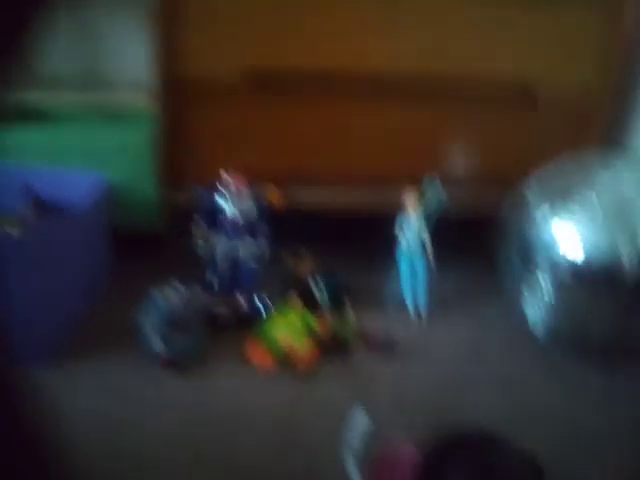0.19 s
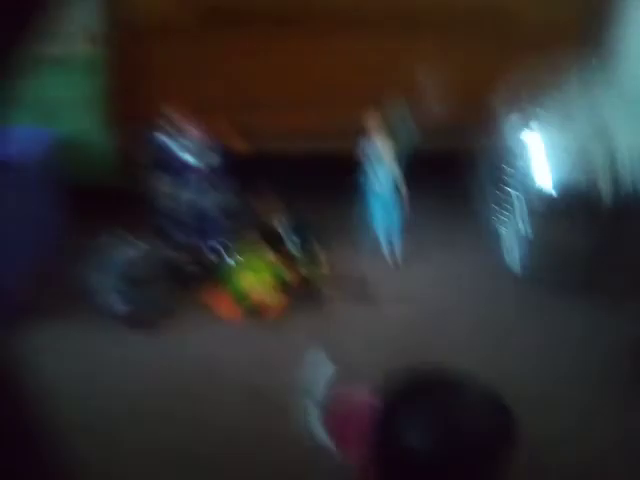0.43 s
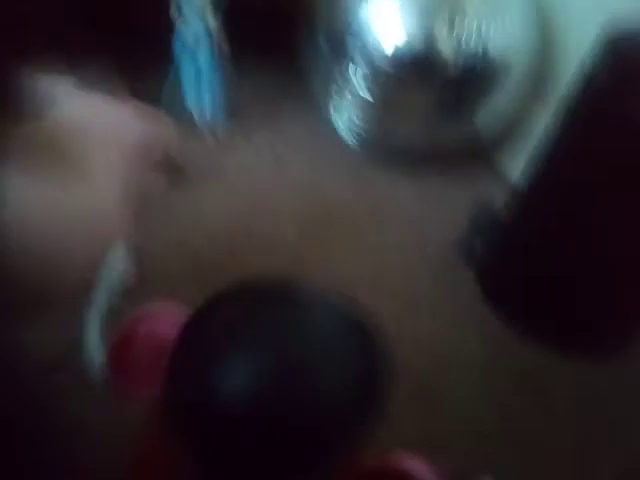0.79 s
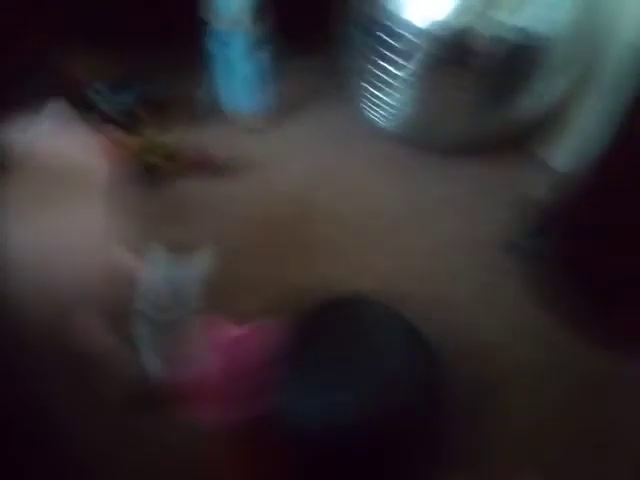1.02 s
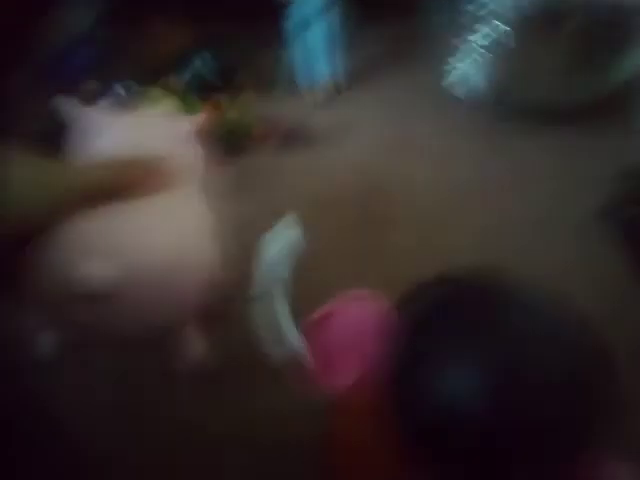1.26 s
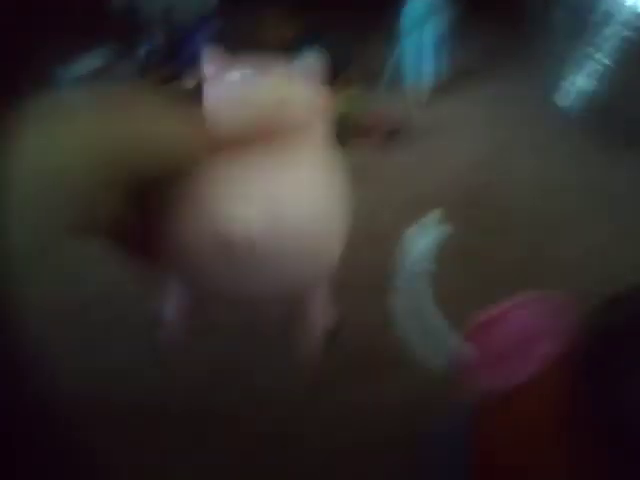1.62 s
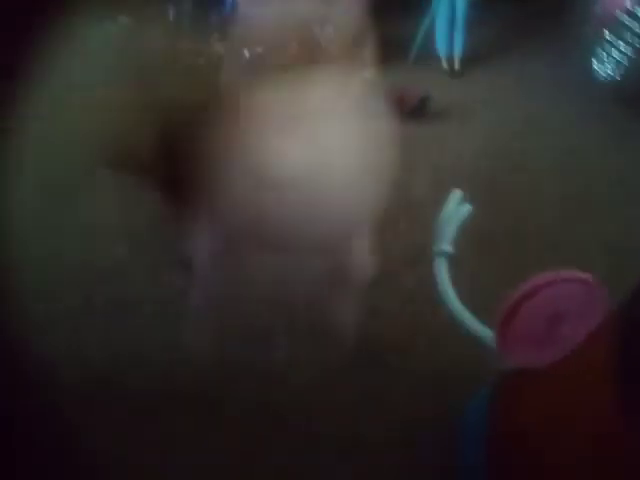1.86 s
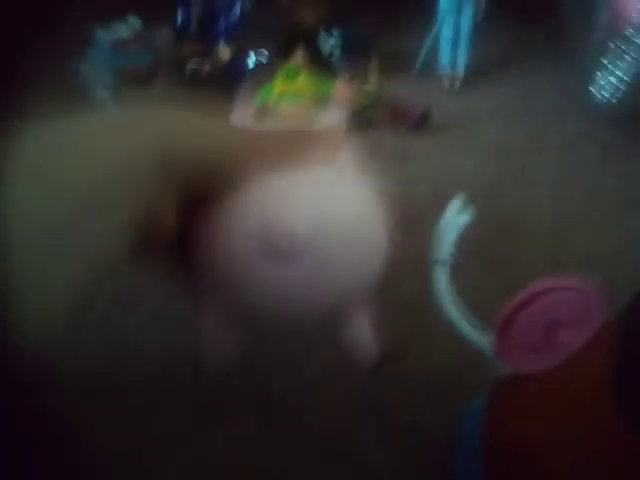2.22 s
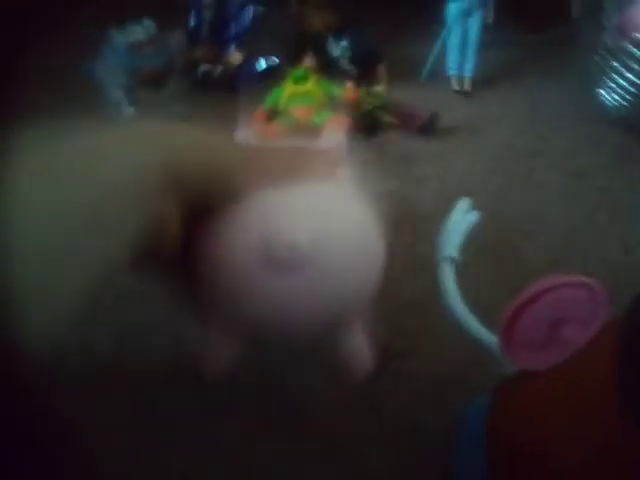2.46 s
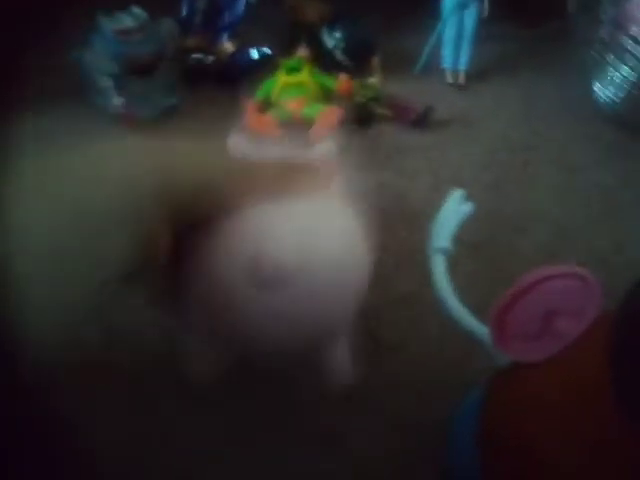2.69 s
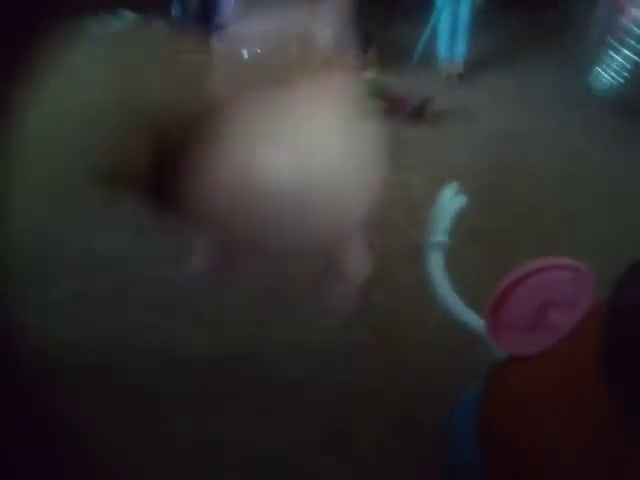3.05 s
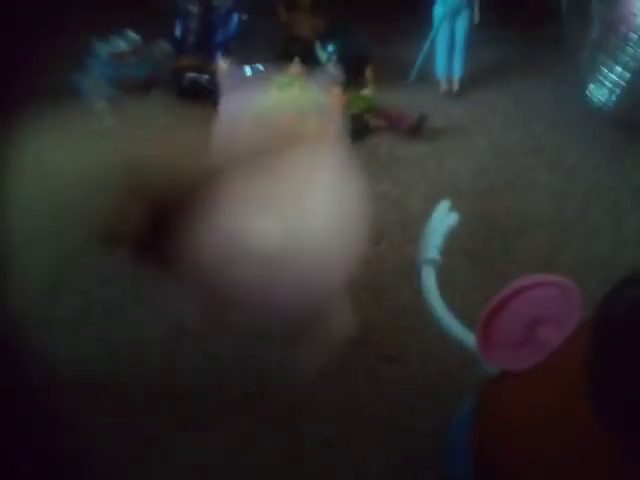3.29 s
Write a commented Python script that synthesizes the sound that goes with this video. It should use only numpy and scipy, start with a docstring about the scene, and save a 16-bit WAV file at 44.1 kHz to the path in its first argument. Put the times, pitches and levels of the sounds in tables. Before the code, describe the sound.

After a near-silent start with a faint rub, a hand lifts a plastic toy bank and shakes it; coins clack and patter against the shell, with dull handling bumps, close up in a small soft room.

```python
"""Coins in a plastic toy bank

A hand lifts a hollow toy bank off a carpet and shakes it close to a small camera, over a quiet hush.
Filtered noise brushes; noise bursts and rough rings make the coin knocks and their patter of ticks.
Decaying sines make the hollow body's low ring, the handling bumps and the very high coin chimes.
A short, dull noise tail puts the coins, chimes and brushing in a small room."""
import sys
import numpy as np
from scipy import signal
from scipy.fft import rfft, irfft, next_fast_len
from scipy.io import wavfile
from scipy.ndimage import uniform_filter1d

SR = 44100
rng = np.random.default_rng(int(sys.argv[2]) if len(sys.argv) > 2 else 0)


def transcribe(u):
    """Save the signal u as a 16-bit wav file named by the first command-line argument.

    u: samples, shape (n,) or (channels, n), limited to [-1, 1]; the rate is SR.
    q: integer samples, one column per channel.
    """
    v = np.clip(np.atleast_2d(u).T, -1, 1)
    q = np.round(v * 32767).astype(np.int16)
    wavfile.write(sys.argv[1], SR, q)


N = 152145  # length in samples


def amp(db):
    """Decibels to amplitude."""
    return 10 ** (np.asarray(db) / 20)


def unit(x):
    """Scale to an RMS of one."""
    return x / np.sqrt(np.mean(x ** 2) + 1e-20)


def curve(rows):
    """One dB value per sample, practically silent (-120 dB) after the table."""
    s, db = np.transpose(rows)
    return np.interp(np.arange(N) / SR, s, db, right=-120)


def coloured(x, points):
    """Filter x to the (Hz, dB) shape with a minimum-phase response, so nothing sounds early."""
    m = 4096
    hz, db = np.transpose(points)
    bins_hz = np.fft.rfftfreq(m, 1 / SR)
    shape_db = np.interp(np.log(bins_hz + 1), np.log(hz), db)
    cepstrum = irfft(np.log(amp(shape_db)), m)
    # folding the cepstrum onto positive time makes the filter causal
    cepstrum[1:m // 2] *= 2
    cepstrum[m // 2 + 1:] = 0
    impulse = irfft(np.exp(rfft(cepstrum)), m)
    return signal.fftconvolve(x, impulse)[:N]


def place(s, sounds):
    """Sum the rows of sounds at their start times."""
    starts = np.round(np.asarray(s) * SR).astype(int)
    at = starts[:, None] + np.arange(sounds.shape[1])
    return np.bincount(at.ravel(), sounds.ravel(), N + SR)[:N]


KNOCK_Q, KNOCK_NOISE_DB = 8.05, -2.5  # ring sharpness; burst level against the ring
BRIGHTENS, TAP_RISE_S = 0.51, 0.0012  # harder raps hiss more (dB per dB); contact time


def taps(s, db, hz, t60):
    """Short raps: a dying burst of noise plus a rough ring at each pitch."""
    t = np.arange(1400) / SR
    noise = rng.standard_normal((2, len(s), len(t)))
    burst_db = KNOCK_NOISE_DB + BRIGHTENS * (db[:, None] + 19.0)
    burst = amp(burst_db - 60 * t / t60) * noise[0]
    rough = 1 + 8.66 * uniform_filter1d(noise[1], size=60, axis=1)
    cycles = np.outer(hz, t)
    ring = rough * np.exp(-np.pi * cycles / KNOCK_Q) * np.sin(2 * np.pi * cycles)
    rise = 1 - np.exp(-t / TAP_RISE_S)
    return place(s, amp(db)[:, None] * rise * (burst + ring))


DAMPING = 1.25  # power of time: rings hold, then die faster


def strike(s, db, stretch, modes, scatter_db, attack_s, rough):
    """Each blow stretches the modes' pitch and scatters their levels; loose contact flutters the ring."""
    t = np.arange(SR // 3) / SR
    luck = scatter_db * rng.standard_normal((len(s), len(modes)))
    rings = 0
    for k, (hz, level_db, t60) in enumerate(modes):
        start_db = (db + level_db + luck[:, k])[:, None]
        decay = amp(start_db - 60 * (t / t60) ** DAMPING)
        rings = rings + decay * np.sin(2 * np.pi * hz * np.outer(stretch, t))
    wobble = uniform_filter1d(rng.standard_normal(rings.shape), size=150, axis=1)
    flutter = 1 + rough * unit(wobble)
    return place(s, rings * flutter * (1 - np.exp(-t / attack_s)))


def grip_db(s):
    """The grip loosens and frees the ringing: its level climbs 2 dB per second until 2 s."""
    return 2 * np.minimum(s - 2, 0)


# Tone of the background hush: pitch_hz [Hz], density_db [dB per Hz, relative]
HUSH_TONE = [(30, -23), (70, 3), (180, -5), (500, -17), (2300, -22.5), (12000, -42)]
HUSH_DB = -67.5  # RMS level


def hush():
    """Steady, low-weighted noise under everything."""
    return amp(HUSH_DB) * unit(coloured(rng.standard_normal(N), HUSH_TONE))


# The bank brushing carpet and hand: time_s [s], level_db [dB]
BRUSH_LEVEL = [(0, -60.5), (.115, -43.5), (.2, -62), (.28, -101), (.4, -76.5), (.49, -52), (.75, -69.5)]
# Tone of plastic rubbing on pile: pitch_hz [Hz], density_db [dB per Hz, relative]
RUB_TONE = [(200, 0), (550, 5), (1400, -7.5), (2650, 8), (3900, -14), (5100, -5), (8000, -40)]


def brush():
    """Fuzzy rubbing of plastic on pile: noise with a randomly uneven grain."""
    grain = amp(2.8 * unit(uniform_filter1d(rng.standard_normal(N), size=200)))
    rubbing = coloured(grain * rng.standard_normal(N), RUB_TONE)
    return amp(curve(BRUSH_LEVEL)) * unit(rubbing)


# Coins knocking the shell: start_s [s], level_db [dB, relative strength], pitch_hz [Hz]
COIN_KNOCKS = [(0.497, -27.5, 1950), (0.518, -21.5, 2370), (0.544, -22, 2050), (0.556, -19.5, 2800),
               (0.584, -21, 1610), (0.608, -38, 2300), (0.767, -29.5, 1430), (0.81, -18.5, 2870),
               (0.889, -29, 1015), (0.904, -16, 2090), (0.96, -24.5, 2650), (0.984, -18.5, 3160),
               (1.014, -18.5, 1740), (1.023, -15.5, 1497), (1.043, -20, 2120), (1.069, -16, 2240),
               (1.088, -18, 1880), (1.115, -17.5, 2430), (1.181, -14, 1910), (1.284, -28, 2620),
               (1.323, -16.5, 2240), (1.329, -24.5, 1990), (1.349, -12, 1570), (1.363, -13, 2510),
               (1.475, -15.5, 3370), (1.512, -22, 3050), (1.546, -13, 1306), (1.558, -13, 6100),
               (1.599, -15.5, 1190), (1.713, -19, 3250), (1.728, -16.5, 5410), (1.769, -16.5, 3670),
               (1.786, -11.5, 1330), (1.838, -15, 2940), (1.894, -19, 2210), (1.945, -16.5, 2290),
               (1.988, -15, 1015), (2.037, -16, 1270), (2.05, -11, 1124), (2.061, -27.5, 2520),
               (2.0899, -14, 5100), (2.105, -25, 3350), (2.185, -21.5, 2340), (2.239, -17, 1850),
               (2.262, -17, 3340), (2.281, -16.5, 3240), (2.2905, -15.5, 1120), (2.295, -32, 1230),
               (2.3085, -17.5, 1170), (2.326, -10.5, 1244), (2.348, -39, 1810), (2.368, -20, 3080),
               (2.416, -20.5, 2270), (2.444, -17.5, 5400), (2.466, -19, 2980), (2.504, -52, 1500),
               (2.518, -13, 1192), (2.558, -12, 6500), (2.582, -16.5, 1020), (2.625, -22.5, 1210),
               (2.69, -18, 1920), (2.719, -15.5, 2650), (2.743, -14, 1240), (2.758, -13.5, 5000),
               (2.774, -10, 5900), (2.89, -21.5, 2204), (2.913, -16.5, 2210), (2.948, -19.5, 3080),
               (2.97, -20, 1080), (3.01, -16.5, 752), (3.029, -13, 1128), (3.151, -17, 2440),
               (3.167, -14.5, 5360), (3.22, -13.5, 3600), (3.277, -13.5, 2080), (3.3, -9.5, 2110),
               (3.409, -14.5, 5100)]
# Tone the plastic shell lets through: pitch_hz [Hz], gain_db [dB]
SHELL_TONE = [(100, -21), (450, -8), (1150, 0), (1650, -3.5), (2300, 3), (4000, -1.5), (6300, 2),
              (7800, -17.5), (11500, -21.5)]
KNOCK_T60_S, KNOCK_DB = 0.024, 1.5  # noise burst decay; level trim
TICK_COUNT, TICK_T60_S, TICK_DB = 1600, 0.0091, -10  # count; burst decay; level against the knocks
TICK_HZ, TICK_SPREAD = 3247, 0.572  # median pitch; spread of its natural log
TICK_SCATTER_DB, TICK_CAP = 4.5, 3  # scale of the random level lift; its cap in scales
PATTER_RISE_S, PATTER_T60_S = 0.0034, 0.24  # the patter swells in, then decays
PATTER_GROWS = 0.81  # growth with the knock's strength (dB per dB)


def coins():
    """Each knock sets off a dying patter of ticks; all pass the shell."""
    hit_s, hit_db, hit_hz = np.transpose(COIN_KNOCKS)
    knocks = taps(hit_s, hit_db + KNOCK_DB, hit_hz, KNOCK_T60_S)
    tick_s = rng.random(TICK_COUNT) * (N - 1) / SR
    since = tick_s[:, None] - hit_s
    age = np.abs(since)
    mean_db = hit_db.mean()
    start_db = TICK_DB + mean_db + PATTER_GROWS * (hit_db - mean_db)
    swell = 1 - np.exp(-age / PATTER_RISE_S)
    patter = swell * amp(start_db - 60 * age / PATTER_T60_S) ** 2
    # only knocks already past feed a tick
    power = np.where(since > 0, patter, 0).sum(axis=1)
    lift = np.minimum(rng.exponential(size=TICK_COUNT), TICK_CAP)
    tick_db = 10 * np.log10(power + 1e-14) + TICK_SCATTER_DB * lift
    spread = np.exp(TICK_SPREAD * rng.standard_normal(TICK_COUNT))
    tick_hz = np.clip(TICK_HZ * spread, 1100, SR / 2)
    ticks = taps(tick_s, tick_db, tick_hz, TICK_T60_S)
    return coloured(knocks + ticks, SHELL_TONE)


# The heap of coins landing on the wall: start_s [s], level_db [dB, before the mode levels]
HEAP_THUDS = [(1.04, -45), (1.338, -51.5), (1.788, -34), (1.834, -37.5), (2.061, -39), (2.294, -37.5),
              (2.555, -42), (3.014, -44), (3.152, -39), (3.289, -38.5)]
# Ringing modes of the hollow body: pitch_hz [Hz, nominal], level_db [dB, relative], t60_s [s]
HOLLOW_MODES = [(288.2, 9, 0.22), (609.9, 2, 0.2)]
KNOCK_HOLLOW_DB = -31.5  # how much less a single knock stirs the body


def thuds():
    """The heap lands and the hollow body rings, its pitch varying per blow; single knocks stir it less."""
    heap_s, heap_db = np.transpose(HEAP_THUDS)
    knock_s, knock_db, _ = np.transpose(COIN_KNOCKS)
    s = np.concatenate([heap_s, knock_s])
    db = np.concatenate([heap_db, knock_db + KNOCK_HOLLOW_DB + grip_db(knock_s)])
    stretch = 1 + .025 * rng.standard_normal(len(s))
    return strike(s, db, stretch, HOLLOW_MODES, scatter_db=4.5, attack_s=0.0046, rough=0.23)


# Fingers bumping the camera body: start_s [s], level_db [dB], pitch_hz [Hz]
FINGER_BUMPS = [(0.546, -33.5, 343), (0.96, -32, 99), (1.016, -27.5, 450), (1.041, -28, 183),
                (1.858, -29.5, 130), (2.021, -35, 140)]
BUMP_T60_S = 0.08


def bumps():
    """Dull low thumps of handling: one short fluttering sine per bump."""
    s, db, hz = np.transpose(FINGER_BUMPS)
    one_mode = [(1, 0, BUMP_T60_S)]  # a 1 Hz mode, stretched to each bump's pitch
    return strike(s, db, hz, one_mode, scatter_db=0, attack_s=.005, rough=.5)


# Thin high modes of the coins: pitch_hz [Hz, nominal], level_db [dB, relative], t60_s [s]
COIN_MODES = [(8160, -11, 0.14), (12650, -9.5, 0.21), (13050, -6, 0.25), (14000, -8, 0.17)]
LIFT_S = .75  # the bank leaves the carpet and the coins fly free
CHIME_DB, CHIME_SCATTER_DB = -33, 9  # level against the knock; spread per mode
COIN_SPREAD = 0.004  # pitch spread between coins, as a fraction


def chimes():
    """Each knock after the lift frees coins, no two quite alike, to ring in their thin high modes."""
    s, db, _ = np.transpose([row for row in COIN_KNOCKS if row[0] > LIFT_S])
    stretch = 1 + COIN_SPREAD * rng.standard_normal(len(s))
    chime_db = db + CHIME_DB + grip_db(s)
    return strike(s, chime_db, stretch, COIN_MODES, CHIME_SCATTER_DB, attack_s=0.0091, rough=0.45)


ROOM_T60_S, ROOM_DB, ROOM_DARK_HZ = 0.22, -4, 9400  # decay; level; treble cutoff


def room(x):
    """A small soft room answers briefly and dull; its noise tail is renewed every 0.2 s."""
    t = np.arange(SR // 3) / SR
    out = np.zeros(N + SR)
    step = SR // 5
    for a in range(0, N, step):
        tail = amp(-60 * t / ROOM_T60_S) * rng.standard_normal(len(t))
        wet = signal.fftconvolve(x[a:a + step], tail / np.linalg.norm(tail))
        out[a + 200:][:len(wet)] += wet  # 200 samples of pre-delay
    b, a = signal.butter(2, ROOM_DARK_HZ, fs=SR)
    return amp(ROOM_DB) * signal.lfilter(b, a, out[:N])


def scene():
    """Only the brushing, coins and chimes excite the room; thuds, bumps and hush stay dry."""
    background = hush()
    bank = brush() + coins() + chimes()
    return (background + bank + room(bank) + thuds() + bumps())[None]


TOP_HZ = 15900


def record(dry):
    """The camera keeps nothing above its band limit."""
    m = next_fast_len(N + SR)
    kept = np.fft.rfftfreq(m, 1 / SR) < TOP_HZ
    return irfft(rfft(dry, m) * kept, m)[..., :N]


dry = scene()
out = record(dry)
transcribe(out)
```